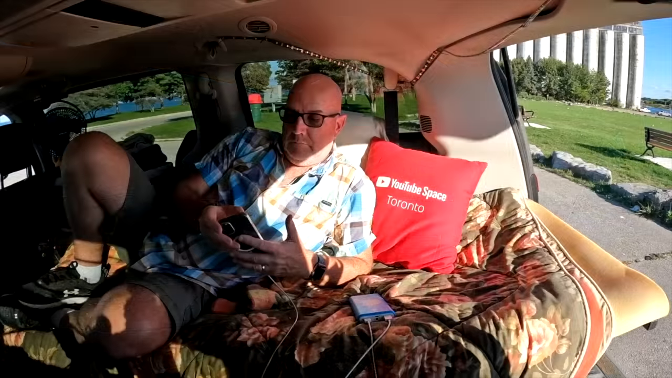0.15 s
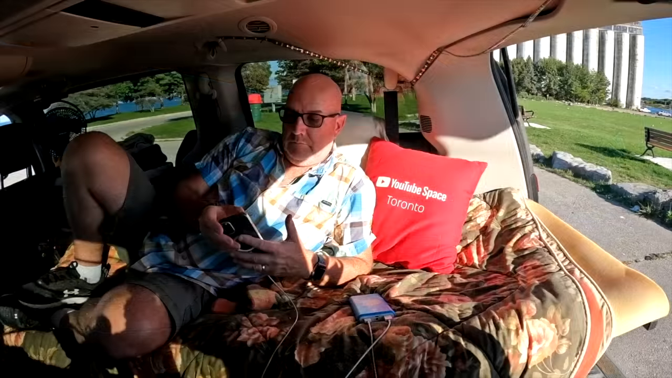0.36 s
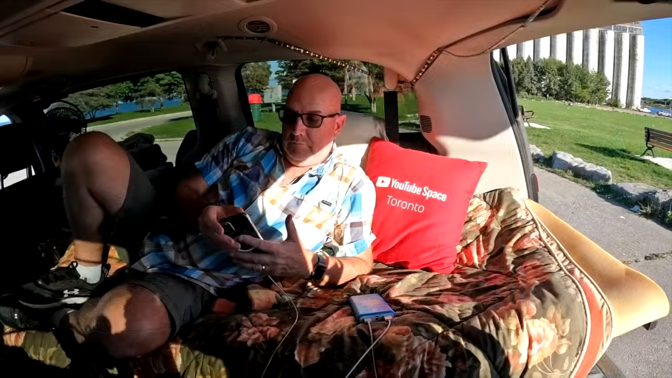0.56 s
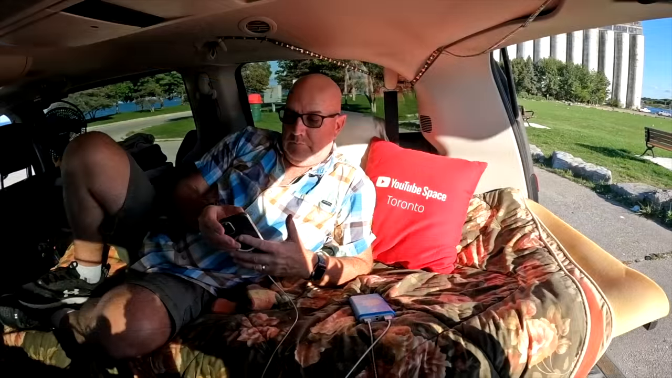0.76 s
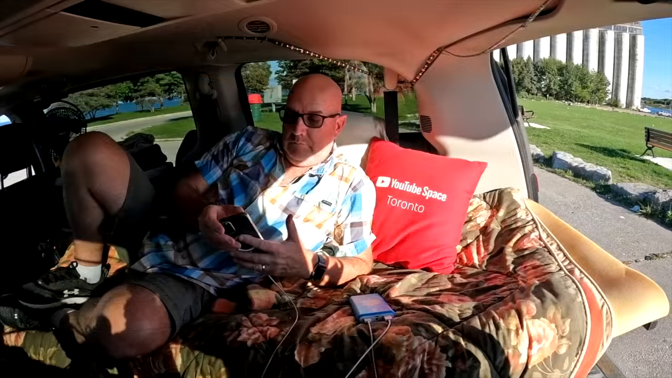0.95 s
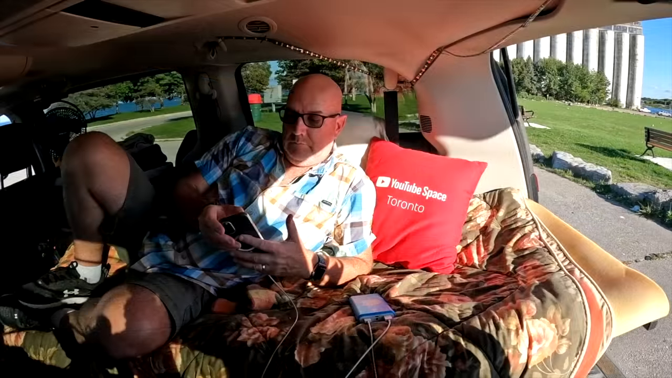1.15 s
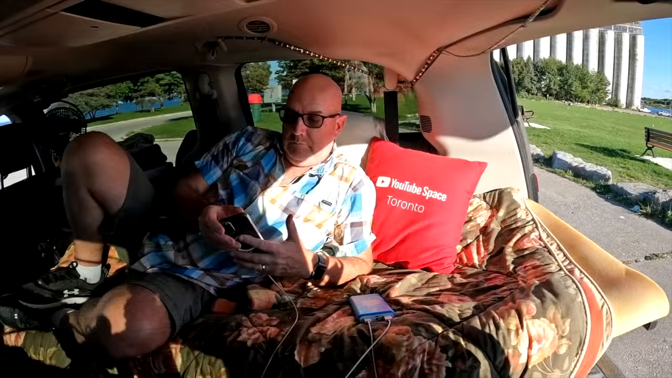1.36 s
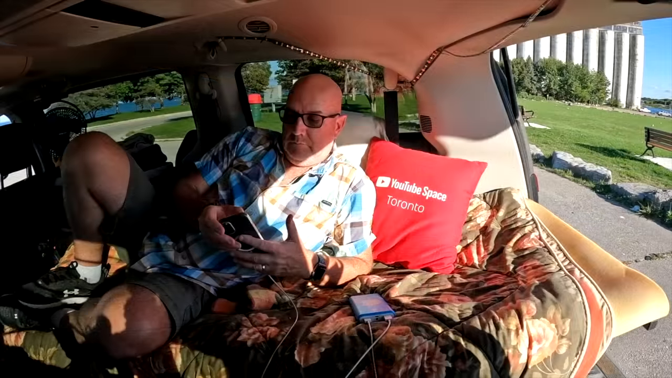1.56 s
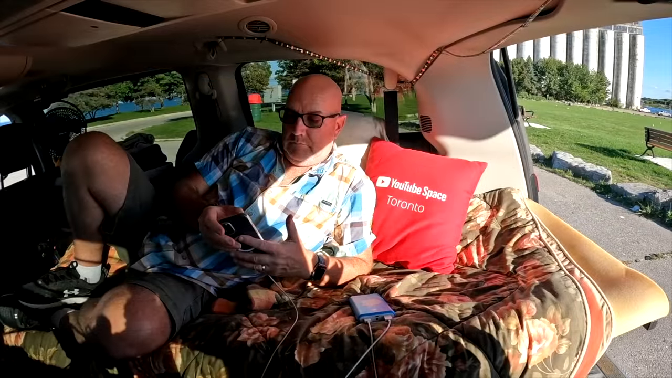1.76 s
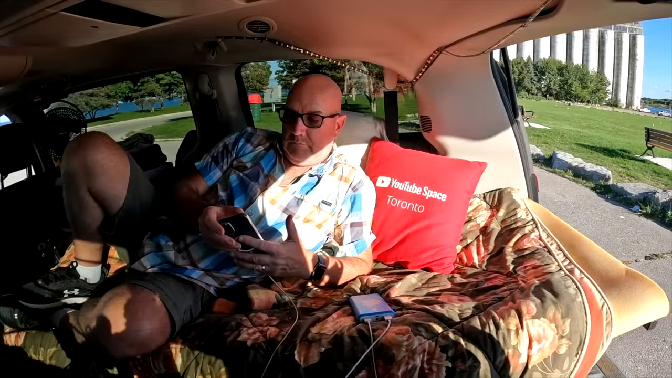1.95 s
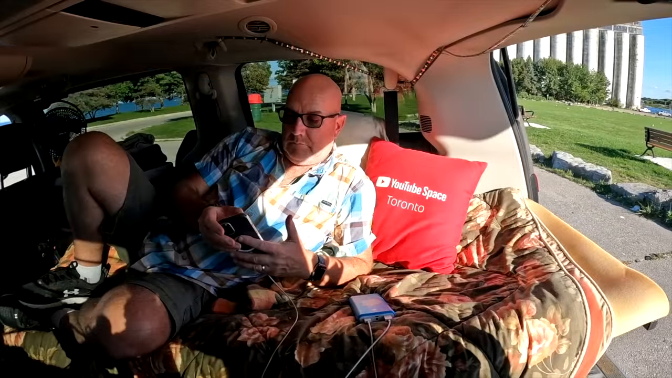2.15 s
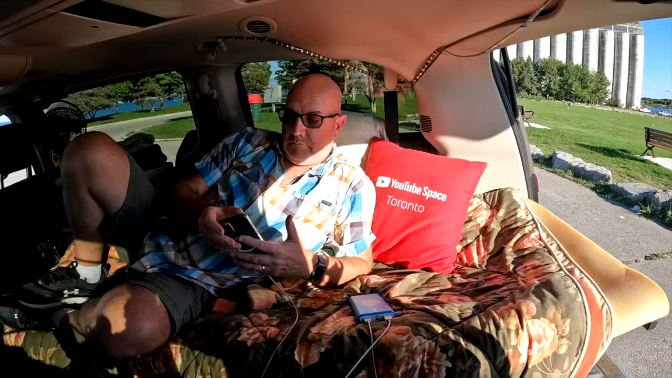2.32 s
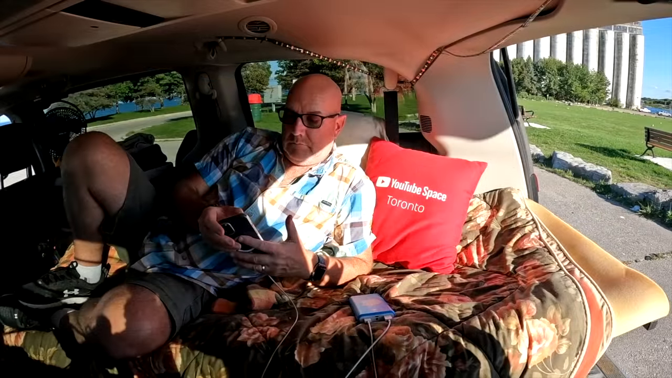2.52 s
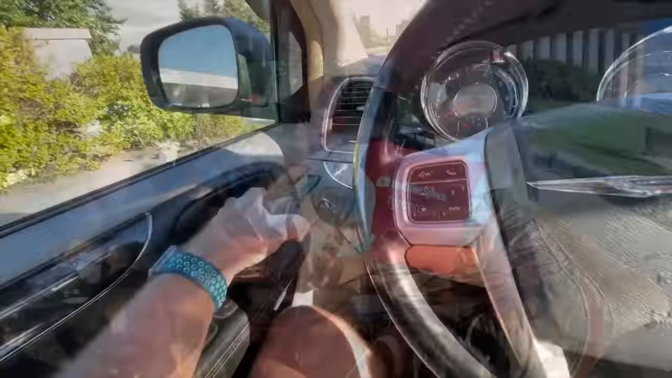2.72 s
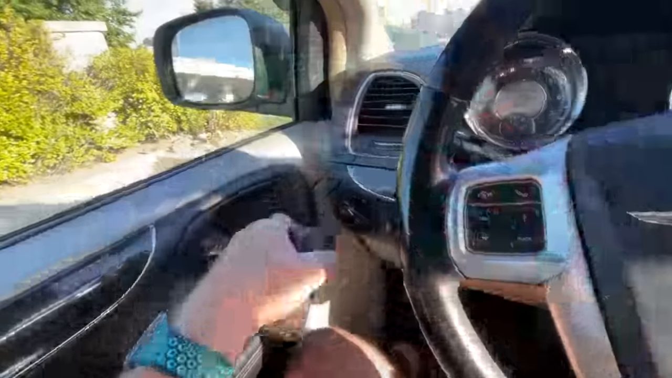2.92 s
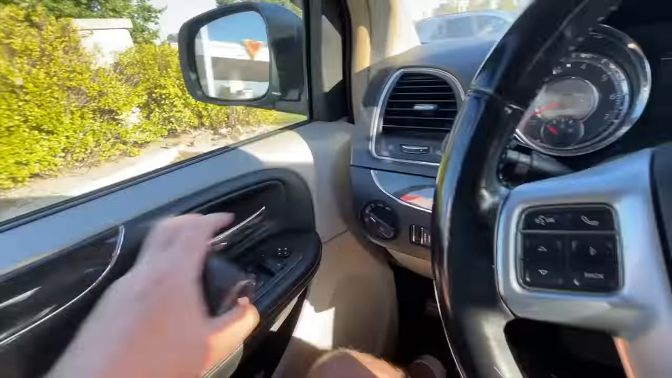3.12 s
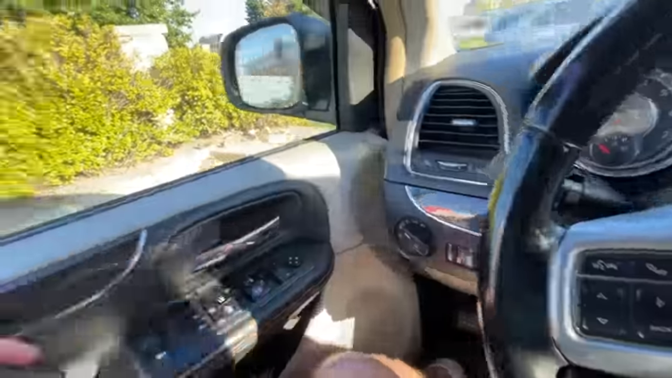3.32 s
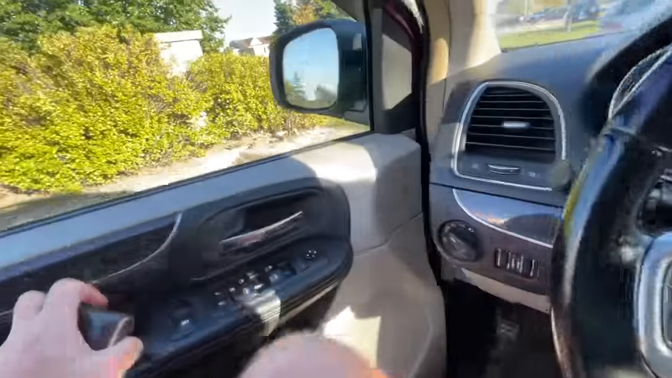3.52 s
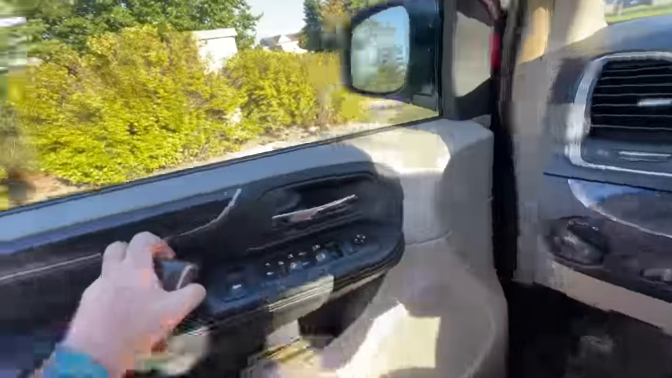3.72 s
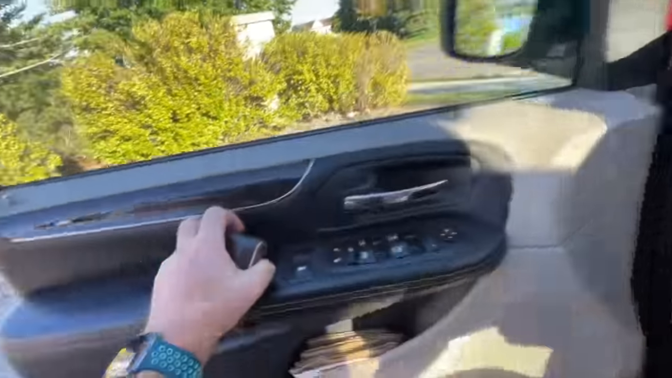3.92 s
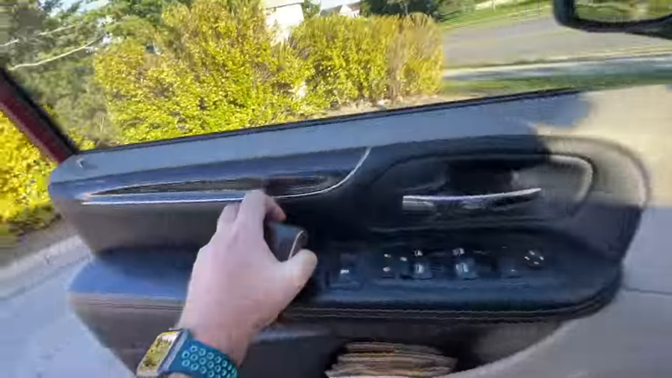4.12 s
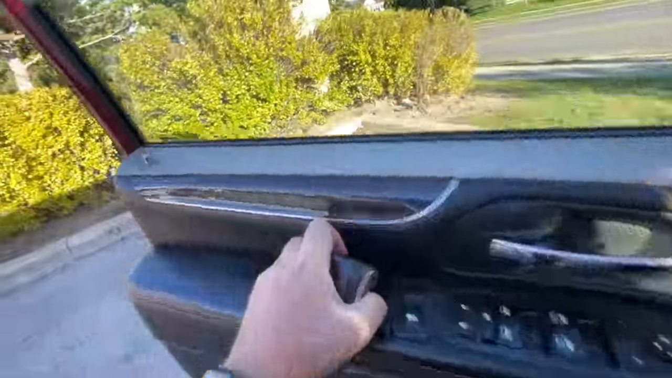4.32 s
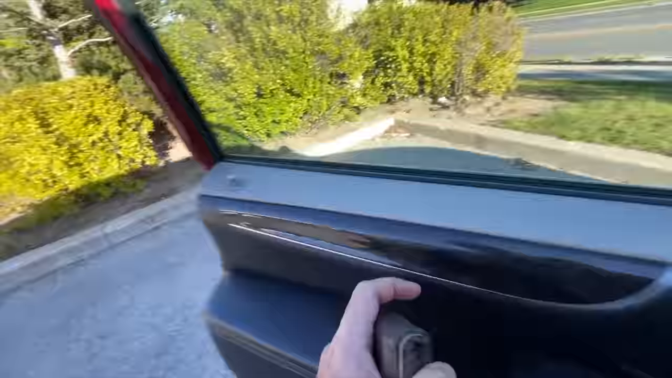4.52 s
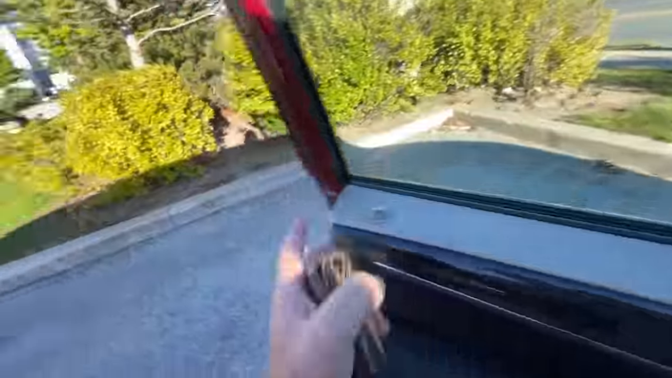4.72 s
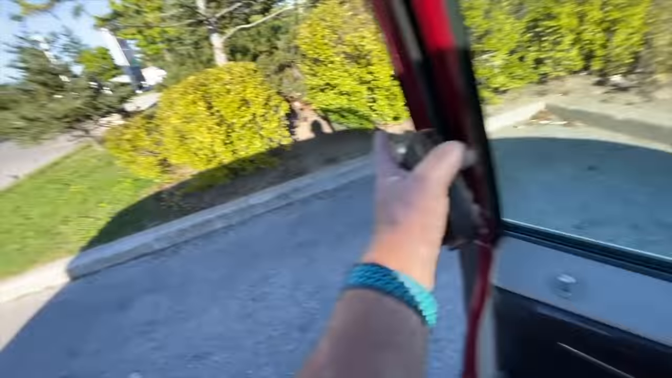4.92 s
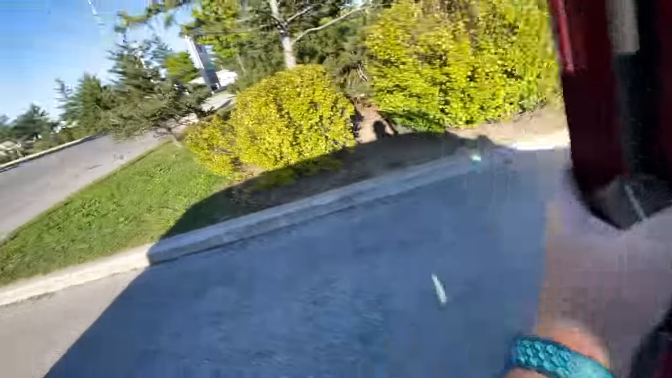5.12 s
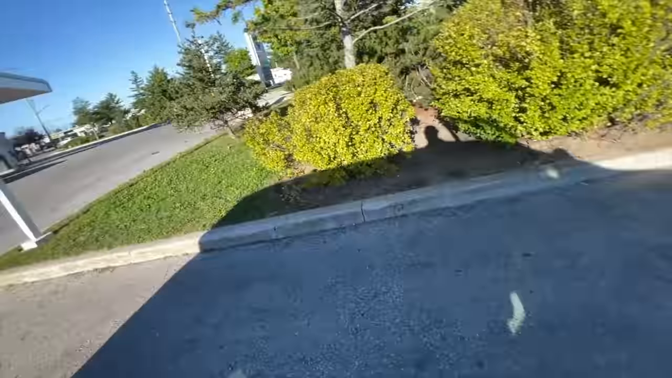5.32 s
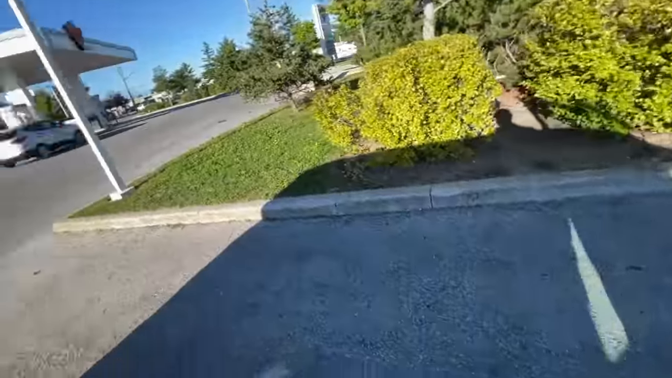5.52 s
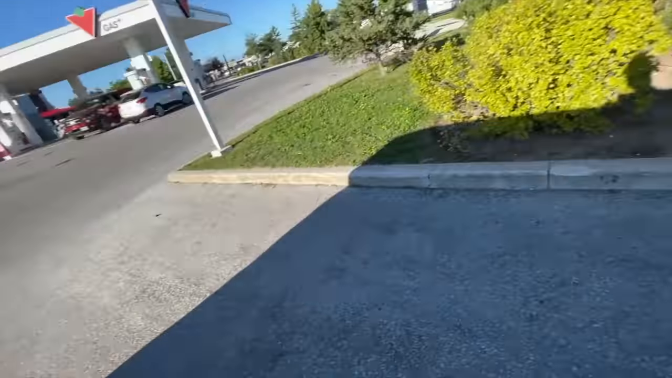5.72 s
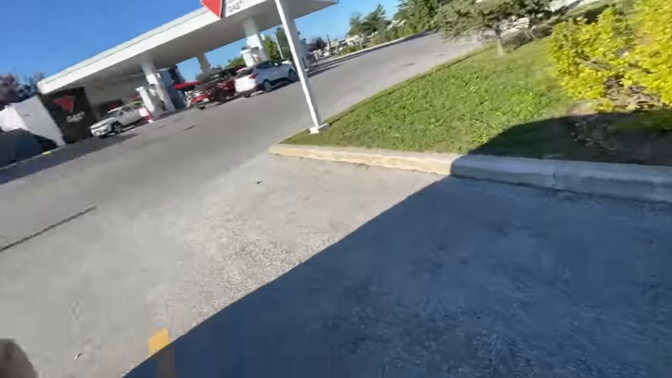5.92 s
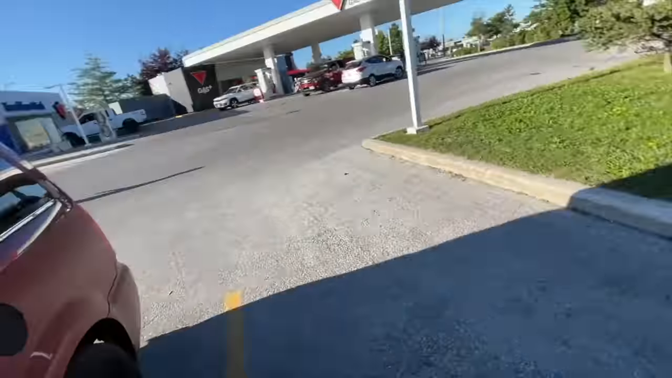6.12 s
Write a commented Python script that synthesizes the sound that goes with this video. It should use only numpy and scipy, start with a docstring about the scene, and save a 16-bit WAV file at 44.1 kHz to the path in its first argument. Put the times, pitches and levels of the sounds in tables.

```python
"""A short wash of coloured noise fades out; in a parked van an idling engine hums, a cricket chirps, cloth shifts.
The place then gives way to the driver's seat, stereo microphones close to the door and the street muffled beyond.
The handle clicks, dull bumps ring the door's modes, and the latch lets go with a clunk that jolts the shell.
The gap at the seal opens on engine rumble, tyre roar and hiss, all shaped noise; the hiss later grows duller.
On stepping out a hand taps, brushes and squeaks on trim and door edge: damped modes and stick-slip noise."""
import sys
import numpy as np
from scipy import signal
from scipy.fft import rfft, irfft, next_fast_len
from scipy.io import wavfile
from scipy.ndimage import uniform_filter1d, map_coordinates

SR = 44100
rng = np.random.default_rng(int(sys.argv[2]) if len(sys.argv) > 2 else 0)


def store_pcm(level_fs):
    """Save levels as 16-bit WAV."""
    pcm = np.round(np.clip(level_fs, -1, 1) * 32767).astype(np.int16)
    wavfile.write(sys.argv[1], SR, np.atleast_2d(pcm).T)


N = 276391

# Spectrum tables give relative levels. Spread is the standard deviation of a bell-shaped band.
# Handle, linkage and trim clicks, each with the knock it gives the panel behind:
# start_s, click_level_db, click_centre_hz, click_t60_s, knock_level_db, knock_centre_hz,
# knock_spread_octaves, knock_t60_s
HANDLE_CLICKS = [(2.7204, -34.5, 3950, .06, -24.5, 1110, .5, .06),
                 (2.756, -40, 6450, .078, -32, 1000, 0.88, .12),
                 (2.808, -36.5, 5000, .04, -19.5, 850, .5, .07),
                 (2.837, -26, 3800, 0.027, -29.5, 1050, 0.39, 0.068),
                 (2.84, -30, 2800, .045, -30, 700, .5, 0.066),
                 (2.865, -37.5, 4000, .045, -26, 1194, 0.4, 0.065),
                 (2.8906, -33.5, 1900, .025, -10.5, 1064, 0.38, 0.028),
                 (2.905, -43, 3500, .04, -29, 1100, .5, 0.035),
                 (2.926, -41.5, 2500, 0.031, -25, 1100, 0.87, 0.034),
                 (2.953, -42.5, 3000, 0.027, -27.5, 900, .5, .03),
                 (3.025, -44, 8000, 0.032, -40, 1190, .45, .06),
                 (3.195, -50.5, 8000, 0.04, -51, 1190, 0.4, .05),
                 (3.343, -26.5, 5400, 0.011, -27, 1390, 1.1, 0.09),
                 (3.391, -45.5, 4000, .012, -42, 900, .6, .05),
                 (3.407, -36.5, 4200, .015, -39, 1500, 0.64, .05),
                 (3.435, -40, 4000, .008, -44, 1500, 0.71, .05),
                 (3.877, -42.5, 5950, 0.079, -46, 1210, .45, .05),
                 (5.019, -28.5, 4600, 0.013, -32.5, 800, 0.57, 0.084),
                 (5.739, -35.5, 2620, .03, -26.5, 1100, 0.61, 0.054),
                 (5.936, -36, 4700, 0.0062, -48, 1500, .45, .04)]
# Dull bumps of hand and arm on the door: start_s, level_db, centre_hz
ARM_BUMPS = [(2.8, -26.5, 420), (2.8415, -22, 453), (2.8678, -17.5, 390), (2.872, -7, 83),
             (2.884, -21, 238), (2.913, -29, 750), (2.923, -27, 153), (2.935, -22.5, 876),
             (2.941, -29.5, 1400), (2.953, -19, 480), (2.958, -19.5, 525), (2.96, -16, 52),
             (6.1355, -30, 900)]
# Thin hard ticks of small parts: start_s, level_db, centre_hz, spread_octaves, t60_s
SMALL_PART_TICKS = [(4.874, -36.5, 8050, .22, 0.0086), (4.903, -41, 6400, .12, 0.016),
                    (5.424, -45, 5500, .8, .008), (5.714, -47, 5250, .3, 0.011),
                    (6.135, -22.5, 4580, .7, 0.0078)]
# Rubbing of linkage, seal and hand: middle_s, half_length_s, level_db, centre_hz, spread_octaves
DOOR_RUBS = [(2.78, .016, -45, 600, 1.2), (2.803, .011, -39, 3020, 2.7), (2.89, .056, -39.5, 2400, 1.6),
             (3.055, .028, -47, 3980, 2.3), (3.09, .0058, -22, 985, 2.2), (3.355, .093, -49, 3820, 2),
             (3.48, .16, -57, 2030, 0.15), (3.68, .035, -47, 480, 1), (3.755, .025, -46, 480, 0.51),
             (4.394, .014, -44, 1000, 1.2), (4.718, .02, -56.5, 8000, 1), (4.957, 0.023, -43, 3400, 1.7),
             (5.422, .035, -50.5, 4200, 1), (5.735, .015, -41.5, 1500, 1.2), (6.127, .013, -38, 2200, 1.3)]
# The pawl slips, then the striker snaps free and scrapes clear:
# delay_after_release_s, level_db, centre_hz, spread_octaves, t60_s
PAWL_SNAPS = [(0, -18, 3300, 1.2, .05), (.005, -18.5, 5450, 1.1, 0.062), (.011, -26.5, 3400, 1.2, .075)]
# The jolt spreads from latch through panels to shell, and the loosened door rebounds:
# delay_after_release_s, level_db, centre_hz, spread_octaves, damping_t60_s
SHELL_JOLTS = [(0, -10.5, 1220, 0.76, .3), (.004, -9, 440, 0.49, .57), (.0074, -10.5, 182, 0.26, 2.5),
               (.022, -9, 83.5, .38, 3.2), (.048, -26, 316, 0.36, .8)]
# Modes of the door's shell and panels, before each blow's own damping: pitch_hz, relative_level_db, t60_s
DOOR_MODES = [(33, -6, 0.32), (49, -5, 0.81), (83.1, -15, 0.37), (100.8, -1, 0.23), (137.4, -3.5, 0.2),
              (159.3, -6, 0.22), (175, 2, 0.15), (289.5, -10, 0.17), (368.5, -5, 0.11), (437, -17.5, 0.16),
              (507, -7.5, 0.13), (595, -12, 0.1), (719, -10, .15), (796, -10, 0.18), (867, -6, 0.081),
              (1035, -12.5, 0.052), (1120, -5, 0.1), (1262, -11, 0.059), (1420, -12, 0.05),
              (1684, -18, 0.067), (1818, -4.5, 0.11), (2000, -16.5, 0.06), (2460, -22, 0.043)]
# Modes of the latch's steel pawl and striker: pitch_hz, relative_level_db, longest_t60_s
STEEL_MODES = [(1776, -0.5, .06), (2660, -3.5, .09), (2770, -7.5, .08), (3530, -11.5, .08),
               (4310, -9.5, .08), (4560, -8, 0.082), (5585, -10.5, .07), (5970, -14.5, .08),
               (6390, -11, .07), (7170, -9, 0.071), (7540, -10, .06), (11400, -14, .05)]
# Colour of hard plastic and steel touching: frequency_hz, level_db_per_hz
CONTACT_SPECTRUM = [(200, -25), (600, 21), (1200, 14), (2500, 0.5), (4500, -6), (6500, -4.5), (8500, -5.5),
                    (10200, -15), (11000, -0.5), (12000, 0.5), (12700, -8.5), (13500, -27), (16000, -49)]
# The door strains on its seals under the pull, then pushes air as it swings:
# middle_s, half_length_s, level_db, centre_hz, spread_octaves
DOOR_SWELLS = [(2.918, 0.07, -24, 66, 1.23), (4.28, 0.15, -32.5, 74.6, 0.44)]
# What the slipping skin excites: centre_hz, spread_octaves, relative_level_db
SQUEAK_BANDS = [(2010, 0.18, 0), (2940, 0.11, -2), (5800, 0.059, -9.5), (6960, 0.54, -17)]
# Hollow taps on the plastic trim, straight ahead: start_s, level_db, pitch_hz, rise_s, t60_s
TRIM_TAPS = [(4.411, -17.5, 523, 0.0041, 0.044), (4.514, -30, 525, .003, 0.073),
             (4.53, -26.5, 519, 0.0047, 0.07), (5.0178, -22, 1680, 0.001, 0.026),
             (5.739, -29.5, 1110, .00049, 0.018), (5.834, -25.5, 589, 0.0021, 0.037),
             (5.839, -26.5, 404, 0.0035, .08), (6.198, -34, 2000, .0016, 0.03)]
# Modes of the trim: multiple_of_tap_pitch, relative_level_db
TRIM_MODES = [(.53, -3.5), (0.998, 1), (1.58, -14), (2.72, -17.5)]
# The door close by, level at the two microphones: frequency_hz, left_minus_right_db
NEAR_LEFT_DB = [(60, 2), (200, 3.5), (600, 3.5), (1050, 3.5), (2200, 5), (4000, 6), (7000, 9), (9000, 3.5),
                (12000, 0)]
# The door close by, lead of the left microphone: frequency_hz, lead_s
NEAR_LEAD = [(500, .00043), (1050, .00029), (1900, .00036), (2800, .00047), (9000, .00047), (11000, .00044)]
# Treble lost from handling sounds outside the cabin: frequency_hz, gain_db
AWAY_GAIN = [(8000, -0.5), (10500, -6.5)]
# The street heard through the open door: time_s, engine_rumble_db, tyre_roar_db, tyre_ring_db
STREET_LEVELS = [(3.3, -36.5, -47.5, -60), (3.45, -41, -46.5, -57), (3.6, -39.5, -51, -72),
                 (3.88, -36.5, -42.5, -57), (4.3, -35, -45, -54.5), (4.7, -34.5, -46.5, -56),
                 (4.9, -34, -47.5, -56), (5.2, -36, -47, -54), (5.45, -36, -46.5, -49),
                 (5.7, -34.5, -47.5, -51), (6, -37.5, -46.5, -51), (6.27, -35, -45, -50)]
# Colour of the engine rumble: frequency_hz, level_db_per_hz
RUMBLE_SPECTRUM = [(15, -43), (25, -60), (46, -3), (70, 1), (112, -3.5), (188, -9.5), (221, -10.5),
                   (292, -16.5), (356, -30), (400, -27.5), (520, -44), (880, -120)]
# Colour of the tyre roar: frequency_hz, level_db_per_hz
TYRE_SPECTRUM = [(180, -25), (300, -2), (352, 2), (505, 1), (572, -3.5), (710, -3.5), (777, -1), (880, -2),
                 (1100, -3), (1290, -5.5), (2130, -9), (2760, -17), (4500, -26), (5850, -26.5),
                 (9900, -120)]
# Colour of the far hiss: frequency_hz, level_db_per_hz
HISS_SPECTRUM = [(1800, -28), (3000, -3), (5000, -1), (9200, -1), (10200, -4), (11300, 0), (12300, -3),
                 (13100, -24), (15000, -80)]
# Gain on the later, duller hiss: frequency_hz, gain_db
LATER_HISS_GAIN = [(3000, -7.5), (8000, -3), (12000, -7.5)]
# Likeness of the street at the two microphones: frequency_hz, correlation (-1 to 1)
STREET_LIKENESS = [(60, 0.8), (150, 0.99), (300, 0.8), (600, 0.094), (1200, 0.32), (2500, 0.017),
                   (6000, 0.027), (12000, 0.054)]
# Road power heard from the right around leaving the seat, end values held: time_s, power_share (0 to 1)
RIGHT_SHARE = [(4.3, 0.22), (4.8, 0.18), (5.2, 0.33), (5.6, 0.086)]
# The street, level at the two microphones: frequency_hz, left_minus_right_db
STREET_LEFT_DB = [(60, 1), (200, -1.5), (600, 7), (1200, 4.5), (2200, 0.5), (4000, 7), (7000, 9), (9000, 3),
                  (12000, -1)]
# The street, lead of the left microphone: frequency_hz, lead_s
STREET_LEAD = [(1000, .00047)]
# Orders of the idling engine: multiple_of_firing_rate, level_db (rms)
ENGINE_ORDERS = [(1, -75.5), (1.5, -61), (2, -68.5), (3, -54), (4, -44.5), (5, -63.5), (6, -62.5), (7, -61),
                 (8, -60.5), (9, -60), (10, -74.5), (11, -65.5), (12, -61), (16, -73.5), (20, -68.5)]
# Colour of the cabin's dull air: frequency_hz, level_db_per_hz
CABIN_SPECTRUM = [(25, -30), (45, -28), (75, -29.5), (100, -11), (160, -10), (230, -10), (400, -9),
                  (540, -11.5), (680, -17.5), (900, -21.5), (1500, -24), (2200, -29.5), (3100, -32),
                  (4200, -40), (7000, -49.5), (8500, -67.5), (12000, -62.5), (13500, -99.5)]
# Cricket, about three chirps a second, three wing strokes each:
# first_stroke_middle_s, first_peak_db, second_peak_db, third_peak_db
CRICKET_CHIRPS = [(.25, -62, -61, -60), (.587, -63, -59.5, -64), (.928, -64, -65.5, -60),
                  (1.295, -63, -62.5, -64.5), (1.61, -65, -61.5, -62), (1.944, -65, -62, -63),
                  (2.258, -68, -65, -62), (2.609, -65, -65, -61)]
# Cloth shifting softly in the cabin: middle_s, half_length_s, level_db, centre_hz, spread_octaves
CLOTH_RUBS = [(.26, 0.048, -65.5, 3000, 0.58), (.66, .11, -60.5, 2200, 0.23), (.64, 0.096, -68, 2700, 1.1),
              (1.7, .051, -84, 3400, 1), (2.62, 0.059, -67, 3300, 0.73)]
# Colour of the short wash of noise at the start: frequency_hz, level_db_per_hz
WASH_SPECTRUM = [(25, -17), (55, 8.5), (120, -20), (550, -25), (860, -11.5), (1150, -16), (1800, -25),
                 (6000, -63)]

CHANGE_S = 2.72  # the humming place gives way to the driver's seat
LATCH_S = 3.092  # the latch lets go
OPEN_S, OPENING_S = 3.218, 0.068  # the gap at the seal starts to open; time until the street is fully in
STEP_OUT_S, STEPPING_S = 4.34, 0.52  # leaving the seat
CLICK_OCTAVES, KNOCK_OCTAVES = 1.05, 0.44  # spread of the band that a click or a bump excites
KNOCK_T60_S, KNOCK_T60_SLOPE = 0.13, 0.85  # damping at 500 Hz; the deeper the bump, the longer it rings
TAP_SOFT_HZ = 2200  # a fingertip cannot excite modes far above this
SQUEAK_S, SQUEAK_LENGTH_S, SQUEAK_DB = 4.935, 0.04, -43  # the hand slips along the door's edge
SHUT_RUMBLE_DB, SHUT_TYRES_DB, SHUT_HISS_DB = -8, -6, -7.5  # gain through the shut door
TYRE_RING_HZ, TYRE_RING_OCTAVES = 940, .3  # the tread's resonance
HISS_DB, HISS_PATCHY_DB = -58, 1.2  # level once the door opens; far hiss is smooth
FIRING_HZ, CABIN_DB = 42.75, -50  # the idling engine; the cabin's air
WASH_DB, WASH_S = -45.5, 0.093  # level at the very start; time to fade out
TOP_HZ = 13150  # band limit of the recorder


def amp(db):
    """Decibels to gain."""
    return 10 ** (np.asarray(db) / 20)


def unit(x):
    """x at rms 1."""
    return x / np.sqrt(np.mean(x ** 2) + 1e-20)


def along(points, hz):
    """Values between (Hz, value) points on a log frequency axis, end values held."""
    f, v = np.transpose(points)
    return np.interp(np.log(hz + 1), np.log(f + 1), v)


def curves(rows):
    """One value per sample for each column after the time, end values held."""
    s, *columns = np.transpose(rows)
    return [np.interp(np.arange(N) / SR, s, column) for column in columns]


def ramp(start_s, length_s):
    """A straight rise from 0 to 1."""
    return np.clip((np.arange(N) / SR - start_s) / length_s, 0, 1)


def wobble(rate_hz, n=N):
    """A smooth random curve with rate_hz random knots a second."""
    knots = rng.standard_normal(int(n * rate_hz / SR) + 4)
    return map_coordinates(knots, [np.arange(n) * rate_hz / SR])


def filtered(x, response):
    """x times a complex response of frequency."""
    n = x.shape[-1]
    m = next_fast_len(n + 8192)
    return irfft(rfft(x, m) * response(np.fft.rfftfreq(m, 1 / SR)), m)[..., :n]


def bell(hz, centre_hz, octaves):
    """Weight of the band that a contact excites."""
    return np.exp(-.5 * (np.log2((hz + 1) / centre_hz) / octaves) ** 2)


def coloured(spectrum):
    """Mono noise of rms 1 with the given spectrum."""
    return unit(filtered(rng.standard_normal(N), lambda hz: amp(along(spectrum, hz))))


def band(centre_hz, octaves):
    """Mono noise of rms 1 in one bell-shaped band."""
    return unit(filtered(rng.standard_normal(N), lambda hz: bell(hz, centre_hz, octaves)))


def add(track, s, sound):
    """Mix a sound into the track from time s."""
    part = track[round(s * SR):][:len(sound)]
    part += sound[:len(part)]


def microphones(x, left_db=STREET_LEFT_DB, lead_s=STREET_LEAD):
    """The left microphone hears the source earlier, and louder or softer by frequency."""
    side = np.array([[.5], [-.5]])

    def response(hz):
        lead = np.exp(2j * np.pi * hz * along(lead_s, hz) * side)
        return amp(side * along(left_db, hz)) * lead
    return filtered(x, response)


def scratch(n, centre_hz, octaves):
    """Noise of rms 1 in the colour of hard plastic and steel touching."""
    colour = lambda hz: amp(along(CONTACT_SPECTRUM, hz)) * bell(hz, centre_hz, octaves)
    return unit(filtered(rng.standard_normal(n), colour))


def door(blows, chatter_db=-10, chatter_t60=0.14, swell_cycles=0.52):
    """Each blow rings the door's modes around its own band, under its own damping."""
    out, t = np.zeros(N), np.arange(SR // 2) / SR
    hz, level_db, t60 = np.transpose(DOOR_MODES)[:, :, None]
    panel = hz > 250  # the shell moves as one, the panels each their own way
    for s, db, centre_hz, octaves, damping_t60 in blows:
        size = amp(db + level_db + rng.standard_normal(hz.shape)) * bell(hz, centre_hz, octaves)
        phase = 2 * np.pi * rng.random(hz.shape) * panel
        swell = 1 - np.exp(-t * hz / swell_cycles)  # low modes take longer to get going
        modes = size * swell * amp(-60 * t / t60) * np.sin(2 * np.pi * hz * t + phase)
        ring = np.sum(modes, axis=0)
        # loose trim chatters with the panels
        chatter = amp(chatter_db - 60 * t / chatter_t60) * np.linalg.norm(size * panel)
        chatter = chatter * scratch(len(t), centre_hz, octaves)
        chatter *= 1 - np.exp(-t * centre_hz / swell_cycles)  # a low blow starts softly
        add(out, s, (ring + chatter) * amp(-60 * t / damping_t60))
    return out


def clicks(contacts, steel_db, detune, crack=1.88, crack_s=0.00065, rattle_db=3.5, held=0.91):
    """A sharp crack, an uneven rattle and a brief ring of steel; detune sets how much the parts differ."""
    out, t = np.zeros(N), np.arange(SR // 6) / SR
    steel_hz, level_db, ring_t60 = np.transpose(STEEL_MODES)[:, :, None]
    for s, db, centre_hz, octaves, t60 in contacts:
        bounces = unit(amp(rattle_db * wobble(550, n=len(t))))
        strength = amp(-60 * t / t60) * (bounces + crack * np.exp(-t / crack_s))
        rattle = strength * scratch(len(t), centre_hz, octaves)
        hz = steel_hz * np.exp(detune * rng.standard_normal(steel_hz.shape))
        size = amp(steel_db + level_db) * bell(hz, centre_hz, octaves)
        life = np.minimum(ring_t60, held * t60)  # a held part cannot ring on
        modes = size * amp(-60 * t / life) * np.sin(2 * np.pi * (hz * t + rng.random(hz.shape)))
        add(out, s, amp(db - 6.5) * (rattle + np.sum(modes, axis=0)))  # 6.5 dB under the listed level
    return out


def rubs(strokes, grain_db):
    """Surfaces stick and slip under a short swelling stroke."""
    out = np.zeros(N)
    for s, half, db, centre_hz, octaves in strokes:
        start = max(s - 2 * half, 0)
        u = (np.arange(start, s + 2 * half, 1 / SR) - s) / half
        add(out, start, amp(db) * np.exp(-u ** 2) * scratch(len(u), centre_hz, octaves))
    return out * unit(amp(grain_db * wobble(400)))


def bump(s, db, centre_hz):
    """A blow on the door, damped by the hand that holds it."""
    damping_t60 = KNOCK_T60_S * (500 / centre_hz) ** KNOCK_T60_SLOPE
    return s, db, centre_hz, KNOCK_OCTAVES, damping_t60


def handling():
    """The hand works the handle and pushes the door: clicks with knocks, dull bumps, ticks and rubbing."""
    snaps = [(s, db, hz, CLICK_OCTAVES, t60) for s, db, hz, t60, *_ in HANDLE_CLICKS]
    knocks = [(s, *knock) for s, _, _, _, *knock in HANDLE_CLICKS]
    bumps = [bump(*row) for row in ARM_BUMPS]
    small_parts = clicks(snaps + SMALL_PART_TICKS, steel_db=-7.5, detune=.08)
    return door(knocks + bumps) + small_parts + rubs(DOOR_RUBS, grain_db=3)


def latch():
    """The latch's steel snaps open and the release jolts the door's modes."""
    timed = lambda stages: [(LATCH_S + delay, *rest) for delay, *rest in stages]
    jolt = door(timed(SHELL_JOLTS), chatter_db=-15.5)
    return jolt + clicks(timed(PAWL_SNAPS), steel_db=-1.5, detune=0)


def shudder():
    """The straining, then swinging door makes low swells of narrow-band noise."""
    t, out = np.arange(N) / SR, np.zeros(N)
    for s, half, db, centre_hz, octaves in DOOR_SWELLS:
        swell = amp(db) / (1 + ((t - s) / half) ** 2)
        out += swell * band(centre_hz, octaves)
    return out


def squeak(edge_s=0.0078, grain_db=3):
    """Skin sticks and slips on the door's edge and excites a few resonances."""
    fade_out = ramp(SQUEAK_S + SQUEAK_LENGTH_S - edge_s, edge_s)
    stroke = ramp(SQUEAK_S, edge_s) * (1 - fade_out)
    slips = rng.standard_normal(N) * amp(grain_db * wobble(418))
    resonances = lambda f: sum(amp(db) * bell(f, hz, octaves) for hz, octaves, db in SQUEAK_BANDS)
    return amp(SQUEAK_DB) * stroke * unit(filtered(slips, resonances))


def taps(scuff_db=-11, scuff_octaves=0.65):
    """A soft contact swells into a few hollow, well-damped modes of the trim, with a little scuff."""
    out, t = np.zeros(N), np.arange(SR // 6) / SR
    ratio, level_db = np.transpose(TRIM_MODES)[:, :, None]
    for s, db, hz, rise_s, t60 in TRIM_TAPS:
        size = amp(level_db) / (1 + (ratio * hz / TAP_SOFT_HZ) ** 6)
        modes = size * np.sin(2 * np.pi * (ratio * hz * t + rng.random(ratio.shape)))
        scuff = amp(scuff_db) * scratch(len(t), hz, scuff_octaves)
        envelope = amp(db - 60 * t / t60) * (1 - np.exp(-(t / rise_s) ** 2))
        add(out, s, envelope * (np.sum(modes, axis=0) + scuff))
    return out


def cabin_echo(x, t60=0.028):
    """Glass and trim give a very short, bright answer, different at each microphone."""
    t = np.arange(SR // 6) / SR
    tail = rng.standard_normal((2, len(t))) * amp(-60 * t / t60) * (t > .002)
    wet = signal.fftconvolve(x[None], tail / np.linalg.norm(tail[0]), axes=1)[:, :N]
    return filtered(wet, lambda hz: hz ** 2 / (hz ** 2 + 1800 ** 2))


def rush(spectrum, patchy_db):
    """Stereo noise of rms 1 with patches of random gain, partly alike at the two microphones."""
    z = signal.stft(rng.standard_normal((2, N)), nperseg=1024)[2]
    field = uniform_filter1d(rng.standard_normal(z.shape[1:]), size=7, axis=0)  # smooth over frequency
    field = uniform_filter1d(field, size=10, axis=1)  # and over time
    pair = signal.istft(z * amp(patchy_db * unit(field)), nperseg=1024)[1][:, :N]

    def mid_side(hz):
        turn = np.arccos(np.clip(along(STREET_LIKENESS, hz), -1, 1)) / 2
        return amp(along(spectrum, hz)) * np.array([np.cos(turn), np.sin(turn)])
    mid, side = filtered(pair, mid_side)
    return unit(np.array([mid + side, mid - side]))


def road(tyre_db, ring_db, shut, gust_db=0.9):
    """Tyres roar and their tread rings, with a slow random swell; the shut door softens both."""
    level = amp(SHUT_TYRES_DB * shut + gust_db * wobble(10))
    roar = amp(tyre_db) * rush(TYRE_SPECTRUM, patchy_db=1.6)
    tread = amp(ring_db) * band(TYRE_RING_HZ, TYRE_RING_OCTAVES)
    return level * (roar + tread)


def street():
    """Engines throb low, tyres roar to either side and fine hiss lies over both; the opening door lets them in."""
    rumble_db, tyre_db, ring_db = curves(STREET_LEVELS)
    shut = 1 - ramp(OPEN_S, OPENING_S)
    rumble = amp(rumble_db + SHUT_RUMBLE_DB * shut) * rush(RUMBLE_SPECTRUM, patchy_db=1.5)
    hiss = amp(HISS_DB + SHUT_HISS_DB * shut) * rush(HISS_SPECTRUM, patchy_db=HISS_PATCHY_DB)
    # the hiss grows duller
    hiss += ramp(STEP_OUT_S, STEPPING_S) * filtered(hiss, lambda hz: amp(along(LATER_HISS_GAIN, hz)) - 1)
    right = np.clip(curves(RIGHT_SHARE)[0], 0, 1)
    road_left = np.sqrt(1 - right) * road(tyre_db, ring_db, shut)
    road_right = np.sqrt(right) * road(tyre_db, ring_db, shut)
    return microphones(rumble + hiss + road_left) + microphones(road_right)[::-1]


def hum(drift_cycles=0.0029):
    """The idling engine's orders drift together, over the cabin's dull air."""
    cycles = FIRING_HZ * np.arange(N) / SR + drift_cycles * wobble(2.4)
    lines = np.zeros(N)
    for order, db in ENGINE_ORDERS:
        lines += amp(db) * np.sqrt(2) * np.sin(2 * np.pi * (order * cycles + rng.random()))
    return lines + amp(CABIN_DB) * coloured(CABIN_SPECTRUM)


def cricket(stroke_s=0.034, pitch_hz=4985, fall_hz_per_s=5000, fall_spread=.3, rough_cycles=0.07):
    """Three wing strokes to a chirp, each sliding down in pitch at its own rate as the scraper catches."""
    out, t = np.zeros(N), np.arange(-SR // 50, SR // 50) / SR
    for s, *levels in CRICKET_CHIRPS:
        for k, db in enumerate(levels):
            tune, slide, length = rng.standard_normal(3)
            stroke = np.exp(-(t / (.008 * np.exp(.1 * length))) ** 2)
            catch = rough_cycles * map_coordinates(rng.standard_normal(16), [np.linspace(0, 15, len(t))])
            fall = fall_hz_per_s * np.exp(fall_spread * slide)
            phase = (pitch_hz + 22 * tune) * t - fall * t ** 2 / 2 + catch
            add(out, s + t[0] + k * stroke_s, amp(db) * stroke * np.sin(2 * np.pi * phase))
    return out


def wash():
    """A short wash of coloured noise fades out at the start."""
    return amp(WASH_DB) * (1 - ramp(0, WASH_S)) * coloured(WASH_SPECTRUM)


def scene(echo_db=-1, echo_lost=0.42):
    """Door and street in stereo follow the humming cabin in mono; the echo weakens on stepping out."""
    outside = ramp(STEP_OUT_S, STEPPING_S)
    near = latch() + handling() + squeak() + shudder() * ramp(CHANGE_S, 0.13)
    near = near + outside * filtered(near, lambda hz: amp(along(AWAY_GAIN, hz)) - 1)
    echo = amp(echo_db) * (1 - echo_lost * outside) * cabin_echo(near)
    at_door = microphones(near + echo, NEAR_LEFT_DB, NEAR_LEAD) + taps()
    beyond = ramp(CHANGE_S, 0.006) * street()
    # the first place starts at 0.55 of its level and ends at the change
    first = np.interp(np.arange(N) / SR, [0, .12], [.55, 1]) * (1 - ramp(CHANGE_S, 0.029))
    cabin = first * (hum() + cricket() + rubs(CLOTH_RUBS, grain_db=1.5))
    return at_door + beyond + cabin + wash()


def record(dry):
    """The recorder rounds off the highest peaks and keeps nothing above its band limit."""
    rounded = dry / (1 + (dry / .68) ** 6) ** (1 / 6)
    return filtered(rounded, lambda hz: hz < TOP_HZ)


dry = scene()
out = record(dry)
store_pcm(out)
```